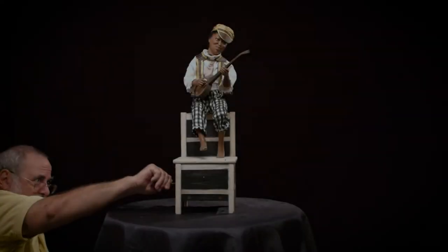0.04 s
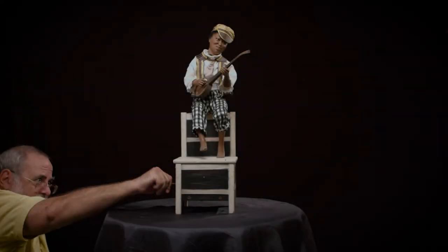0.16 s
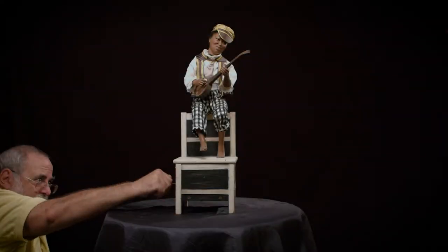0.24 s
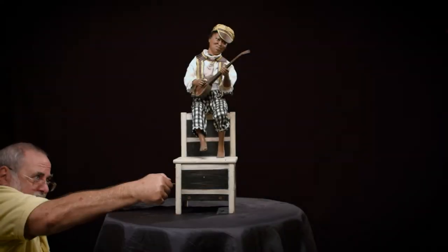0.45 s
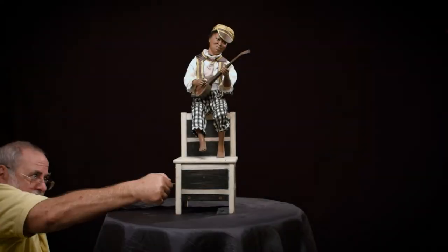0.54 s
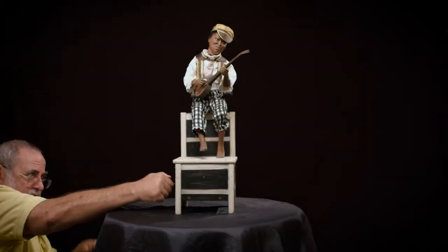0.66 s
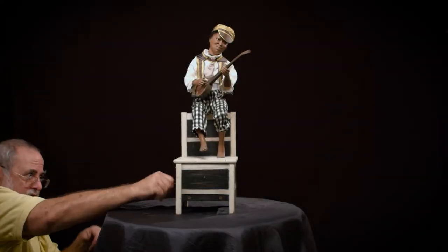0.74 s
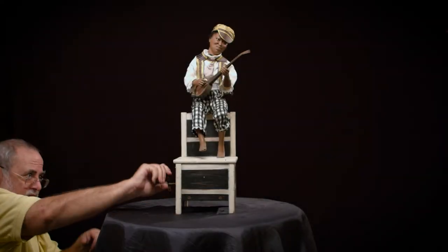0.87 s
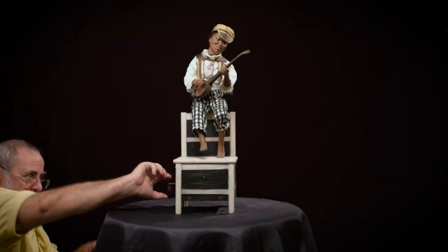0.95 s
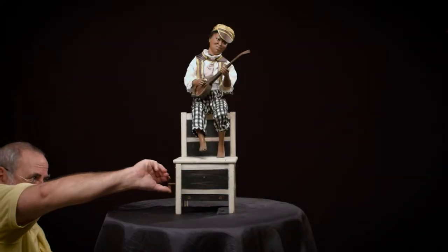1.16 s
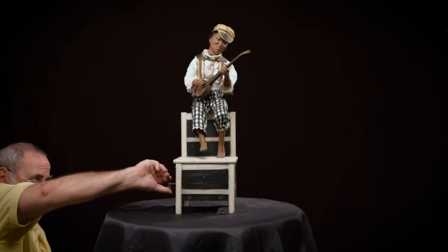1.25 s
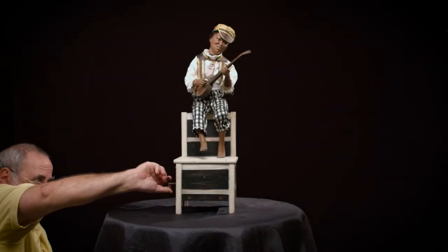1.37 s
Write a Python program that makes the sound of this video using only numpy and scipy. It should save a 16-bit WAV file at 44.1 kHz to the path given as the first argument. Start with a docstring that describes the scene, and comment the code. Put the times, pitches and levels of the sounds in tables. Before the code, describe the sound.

A wind-up mechanism's ratchet clicks sharply four times, then its key settles with soft ticks.

```python
"""A hand winds the clockwork of a small automaton on a wooden chair, in a quiet room.
First there is only a faint rustle over room air and a low hum. After a tiny tick, the ratchet's catch
(the pawl) snaps over four teeth: each snap chatters in the metal works and rings the wooden case.
Then the key settles with small ticks and soft knocks, and the shaft squeaks faintly while the hand
shifts its grip. A soft, deep bump comes last."""
import sys
import numpy as np
from scipy import signal
from scipy.fft import rfft, irfft
from scipy.io import wavfile

SR = 44100
rng = np.random.default_rng(int(sys.argv[2]) if len(sys.argv) > 2 else 0)


def persist_wave(psi):
    """Save psi, clipped to +-1, as 16-bit WAV."""
    counts = np.round(np.clip(psi, -1, 1) * 32767).astype(np.int16)
    wavfile.write(sys.argv[1], SR, np.atleast_2d(counts).T)


N = 61739

# how loud the rustle is over time: time_s, level_db
RUSTLE_LOUDNESS = [(0, -68.5), (.03, -61.5), (.07, -75), (.18, -72), (.24, -61), (.5, -58), (.68, -60),
                   (.77, -63.5), (.89, -65), (1.03, -61.5), (1.11, -59.5), (1.22, -64.5), (1.4, -65)]
# tone of the rustle: pitch_hz, level_db
RUSTLE_TONE = [(88, -48), (150, -7.5), (391, -3), (431, -10), (923, -11.5), (1020, -15), (1120, -14),
               (4410, -22), (6390, -31.5), (16000, -48.5)]
# tone of the room air: pitch_hz, level_db
AIR_TONE = [(15, -46), (25, -25.5), (97, -0.5), (123, -5.5), (476, -19.5), (531, -25.5), (575, -2),
            (624, -8.5), (1400, -29), (14800, -29), (16000, -32.5)]
# small ticks of the key and gears: start_s, level_db, low_db, middle_db, treble_db
KEY_TICKS = [(0.202, -60, 3.5, -8, -28), (0.5182, -43, -8, 1.5, -12), (0.6626, -51, -4, -3, 2),
             (.6990, -43.5, -1.5, -9, -26), (0.715, -43.5, -4, 0.5, -25), (0.761, -46.5, -7.5, -22, -26),
             (0.801, -43, -9.5, -23, -17), (1.052, -57, -1, -17, -28), (1.094, -56, 2.5, -9.5, -25),
             (1.26, -57, 0, -20, -23.5)]
# the low, middle and treble parts of a tick: from_hz, to_hz
TICK_RANGES = [(300, 1020), (1700, 5800), (6500, 27000)]
# snaps of the pawl: start_s, level_db, chatter_ms, case_db, works_db,
# then the tone of the whole snap: boom_db, clack_db, ring_db, treble_db
PAWL_SNAPS = [(0.229, -1.5, 2.2, 3, -1.5, -11.5, -3.5, -0.5, -5.5),
              (.3110, -2.5, 2, 1, 5.5, 2, -1.5, 2, -0.5), (0.3993, 2.5, 3.0, 0, 4, -5.5, -1, -6.5, -6),
              (0.5379, -2, 2.2, 1, -2, 1, 6, 0.5, -0.5)]
# tone of the pawl's chatter: pitch_hz, level_db
CHATTER_TONE = [(100, -34), (250, -1), (500, -5.5), (1000, 0), (2500, 2.5), (4600, 0), (5400, -1.5),
                (6500, -3), (9000, -5.5), (11000, -1.5), (14500, -1.5), (16000, -12.5), (17000, -23.5)]
# notes the wooden case rings with: pitch_hz, level_db, fade_s (time to fade by 60 dB)
CASE_NOTES = [(329, -13, 0.044), (590, -16.5, 0.034), (692, -9, .033), (1006, -1.5, 0.023),
              (1189, 1.5, 0.028), (1541.4, -3, .025), (1830, -9, 0.027)]
# notes the metal works ring with: pitch_hz, level_db, fade_s
WORKS_NOTES = [(2202, -1.5, .018), (2430, -9.5, .016), (2690, -5, .016), (3060, -1, .02), (3410, -6, 0.04),
               (3938, -1.5, 0.024), (4415, 3, 0.012), (4743, -0.5, 0.027), (10600, 0, 0.012),
               (13300, 6, .009)]
# dull knocks of the key against the case: start_s, level_db, pitch_ratio
KEY_KNOCKS = [(0.251, -40.5, 1.1), (.281, -35, 1.36), (0.501, -44.5, 1.27), (0.7189, -29.5, 0.946),
              (0.737, -38, 0.922), (0.808, -43.5, 1.35), (1.022, -52.5, 1.5), (1.050, -46.5, 1.47)]
# notes inside one knock: pitch_hz, level_db, fade_s
KNOCK_NOTES = [(175, -9, 0.04), (239, 1, 0.057), (305, 2.5, 0.027), (410, -4, .04)]
# squeaks of the shaft: start_s, length_s, level_db, upper_notes_db, pitch_ratio
SHAFT_SQUEAKS = [(0.743, 0.028, -75.5, 14, .85), (.798, .024, -66.5, 5.5, 0.84), (0.836, 0.04, -58, 2, 1),
                 (1.008, .034, -57, -8.5, 0.97), (1.038, 0.03, -58.5, -25, 1)]
# notes inside one squeak: pitch_hz, level_db
SQUEAK_NOTES = [(1036, 2), (1550, -13), (2400, -1), (2570, -5.5), (3305, -11.5), (4700, -22.5), (5750, -13)]
# the room's echo, from low to high: pitch_hz, level_db, fade_s
ROOM_ECHO = [(150, -13.5, .27), (330, -11.5, 0.86), (520, -10, .33), (680, -15, 0.27), (880, -10, 0.12),
             (1170, -18.5, 0.25), (1490, -18.5, .3), (2020, -18.5, 0.25), (2500, -19, 0.26),
             (3500, -16.5, 0.22), (5600, -17.5, 0.15), (8000, -15.5, 0.11), (14000, -26, 0.22)]


def gain(db):
    """Turn decibels into a number to multiply by."""
    return 10 ** (np.asarray(db) / 20)


def unit(x):
    """Scale a signal to an average strength (rms) of 1."""
    return x / np.sqrt(np.mean(x ** 2))


def since(start_s):
    """Seconds since a moment, zero before it."""
    return np.maximum(np.arange(N) / SR - start_s, 0)


def band(x, lo_hz, hi_hz, order=3):
    """Keep the sound between two pitches."""
    edges_hz = [lo_hz, min(hi_hz, .47 * SR)]
    return signal.sosfilt(signal.butter(order, edges_hz, 'band', fs=SR, output='sos'), x)


def noise(lo_hz, hi_hz):
    """Noise between two pitches, at strength 1."""
    return unit(band(rng.standard_normal(N), lo_hz, hi_hz))


def colour(x, tone, keep_power=True):
    """Filter a sound along (pitch_hz, level_db) points; keep_power leaves white noise as strong."""
    hz, db = np.array(tone, float).T
    curve = gain(np.interp(np.log(np.fft.rfftfreq(2048, 1 / SR) + 1), np.log(hz), db))
    # fold the filter so that nothing sounds before its cause
    cepstrum = irfft(np.log(unit(curve) if keep_power else curve))
    cepstrum[1:len(cepstrum) // 2] *= 2
    cepstrum[len(cepstrum) // 2 + 1:] = 0
    return signal.fftconvolve(x, irfft(np.exp(rfft(cepstrum))))[:N]


def ring(notes, start_s, ratio=1, size=8192):
    """A struck object: its notes start together and each fades at its own speed."""
    out, first = np.zeros(N), int(start_s * SR)
    t = since(start_s)[first:first + size]
    for k, (hz, db, fade_s) in enumerate(notes):
        wave = (-1) ** k * np.sin(2 * np.pi * hz * ratio * t)
        out[first:first + size] += gain(db - 60 * t / fade_s) * wave
    return out


def burst(start_s, fall_s, hold_s=0):
    """A loudness shape: jump up, hold, die away."""
    t = since(start_s)
    return (t > 0) * np.exp(-np.maximum(t - hold_s, 0) / fall_s)


def swell(start_s, length_s):
    """A loudness shape: one smooth arch."""
    return np.sin(np.pi * np.minimum(since(start_s) / length_s, 1))


def background(flutter_db=1.0, hum_hz=103.9):
    """A faint uneven rustle over room air and a low hum, all made of noise."""
    rustle = unit(colour(rng.standard_normal(N), RUSTLE_TONE))
    rustle_db = np.interp(since(0), *np.array(RUSTLE_LOUDNESS).T) + flutter_db * noise(14, 78)
    air = gain(-68.5) * unit(colour(rng.standard_normal(N), AIR_TONE))
    hum = gain(-83.5) * noise(hum_hz - 8, hum_hz + 8)
    return gain(rustle_db) * rustle + air + hum


def ticks(wood_fall_s=0.011, metal_fall_s=.0014):
    """The key and gears touch lightly: a short metal tick over a longer, lower wooden one."""
    out = np.zeros(N)
    falls_s = (wood_fall_s, metal_fall_s, metal_fall_s)
    for k, ((lo, hi), fall_s) in enumerate(zip(TICK_RANGES, falls_s)):
        shape = sum(gain(db + parts_db[k]) * burst(at, fall_s) for at, db, *parts_db in KEY_TICKS)
        clicks = shape * rng.choice([-1, 1], N) + 1e-18
        make_up = np.sqrt(SR / 2 / (hi - lo))  # gives back the strength the filter takes
        out += band(clicks, lo, hi, order=4) * make_up
    return out


def ratchet(bounce_hz=2400, slip_s=.0014, case_rise_s=0.0054, low_cut_hz=200):
    """The pawl slips off a tooth and drops; it chatters briefly while the works and the case ring."""
    out = np.zeros(N)
    for at, db, chatter_ms, case_db, works_db, boom_db, clack_db, ring_db, treble_db in PAWL_SNAPS:
        slip = gain(-29.5) * burst(at - slip_s, fall_s=slip_s)  # a scrape over the tooth
        drop = gain(6) * burst(at, fall_s=0.00041)  # the first hard hit
        uneven_hz = bounce_hz * (1 + 0.32 * noise(50, 600))
        pulses = 1 + np.cos(2 * np.pi * np.cumsum(uneven_hz) / SR)
        bounces = burst(at, fall_s=.0018, hold_s=chatter_ms / 1000) * pulses
        contact = (slip + drop + bounces) * rng.choice([-1, 1], N)
        chatter = gain(-17.5) * colour(contact, CHATTER_TONE)
        wood = gain(case_db - 10.5) * ring(CASE_NOTES, at) * (1 - np.exp(-since(at) / case_rise_s))
        metal = gain(works_db - 23) * ring(WORKS_NOTES, at)
        tone = [(380, boom_db), (750, 0), (1200, 0), (1850, clack_db), (4400, ring_db),
                (11710, treble_db)]
        out += gain(db) * colour(wood + metal + chatter, tone, keep_power=False)
    return signal.sosfilt(signal.butter(3, low_cut_hz, 'high', fs=SR, output='sos'), out)


def knocks(rise_s=0.0027):
    """The key hits the case so softly that only low notes ring."""
    out = np.zeros(N)
    for at, db, ratio in KEY_KNOCKS:
        soft_start = 1 - np.exp(-since(at) / rise_s)
        out += gain(db) * soft_start * ring(KNOCK_NOTES, at, ratio)
    return out


def squeaks(waver=0.027):
    """The shaft rubs and sings briefly with raspy, unsteady notes."""
    out = np.zeros(N)
    for k, (hz, note_db) in enumerate(SQUEAK_NOTES):
        wavering_hz = hz * (1 + waver * noise(8.3, 290))
        phase = 2 * np.pi * np.cumsum(wavering_hz) / SR
        for at, length_s, db, upper_db, ratio in SHAFT_SQUEAKS:
            level = gain(db + note_db + upper_db * (k > 0))
            out += level * swell(at, length_s) * np.sin(ratio * phase)
    return out


def bump(start_s=1.298, length_s=0.1, pitch_hz=72.4, level_db=-62.5):
    """A last deep bump: one low note swells and fades."""
    return gain(level_db) * swell(start_s, length_s) * np.sin(2 * np.pi * pitch_hz * since(start_s))


def room(x, tail_start_s=.005, size=16384):
    """Add quick echoes off nearby surfaces, then a short tail that gets duller as it fades."""
    t = since(tail_start_s)[:size]
    hz, db, fade_s = np.array(ROOM_ECHO).T
    bins_hz = np.fft.rfftfreq(size, 1 / SR)
    edges_hz = np.geomspace(100, 18000, 16)

    def echoes(lo_hz, hi_hz, shape):
        """Many tiny echoes, made of noise that follows a loudness shape."""
        scatter = irfft(rfft(rng.standard_normal(size)) * ((bins_hz >= lo_hz) & (bins_hz < hi_hz)))
        return unit(scatter * shape) * np.sqrt(2 * (hi_hz - lo_hz) / SR / size)

    response = gain(-13.5) * echoes(290, 5130, burst(0.0058, fall_s=0.016)[:size])  # the quick echoes
    for lo, hi in zip(edges_hz, edges_hz[1:]):
        log_middle = np.log(lo * hi) / 2
        band_db = np.interp(log_middle, np.log(hz), db)
        band_fade_s = np.interp(log_middle, np.log(hz), fade_s)
        response += gain(band_db) * echoes(lo, hi, (t > 0) * gain(-60 * t / band_fade_s))
    return x + signal.fftconvolve(x, response)[:N]


def scene():
    """The clockwork in its room, over the quiet background, in one channel."""
    clockwork = ticks() + ratchet() + knocks() + squeaks() + bump()
    return (background() + room(clockwork))[None]


def record(dry, top_hz=16500):
    """Cut away the very highest treble."""
    return signal.sosfilt(signal.ellip(8, .2, 80, top_hz, fs=SR, output='sos'), dry)


dry = scene()
out = record(dry)
persist_wave(out)
```